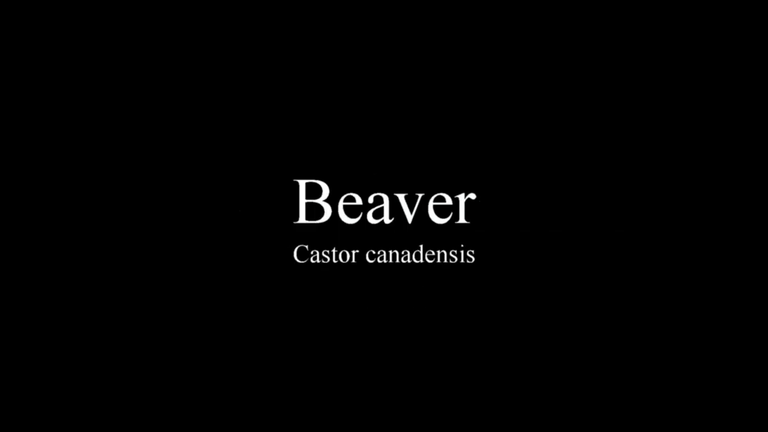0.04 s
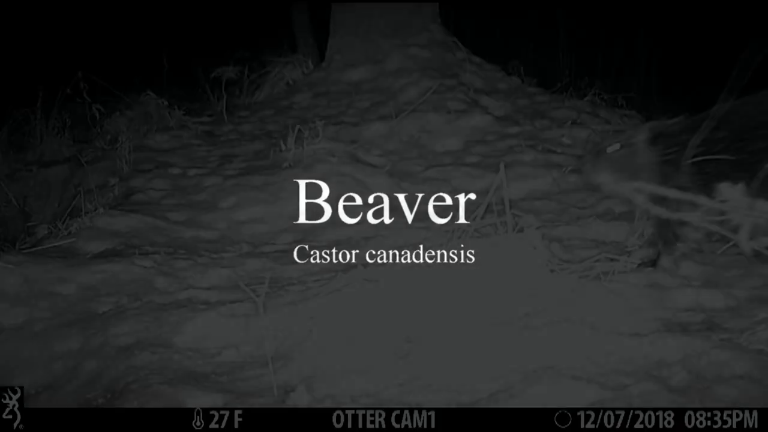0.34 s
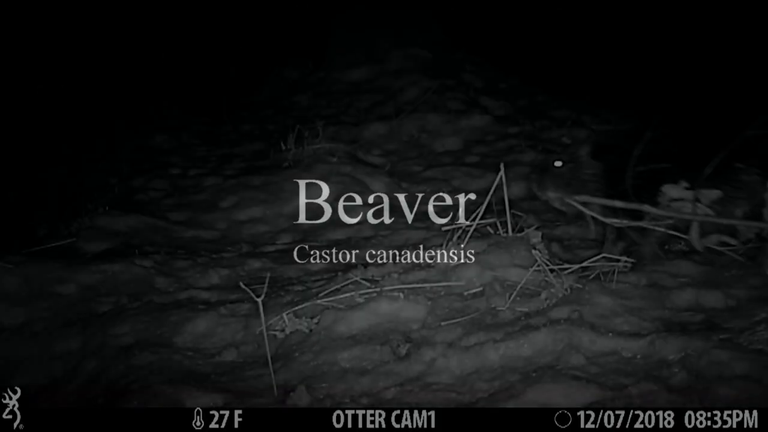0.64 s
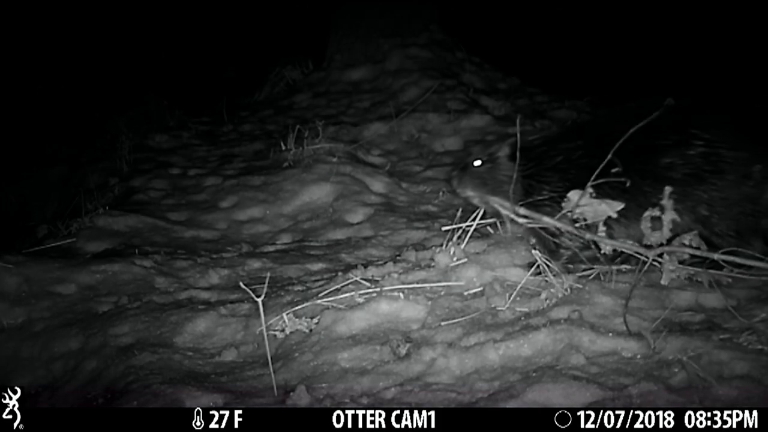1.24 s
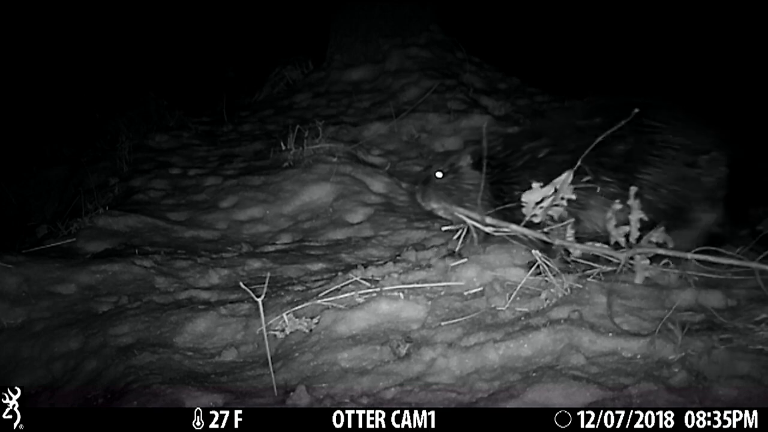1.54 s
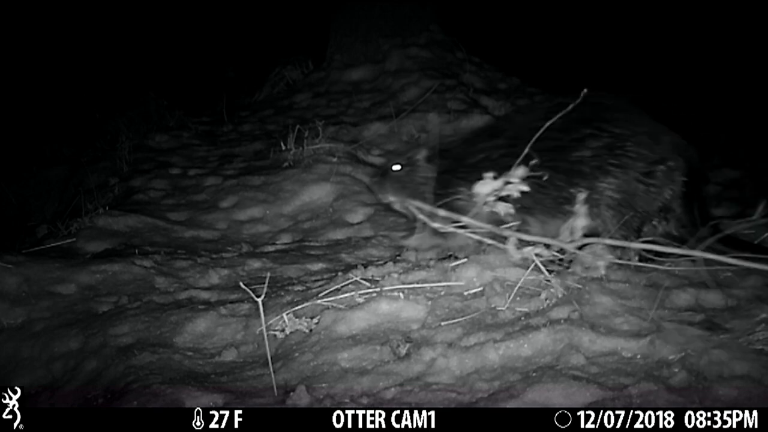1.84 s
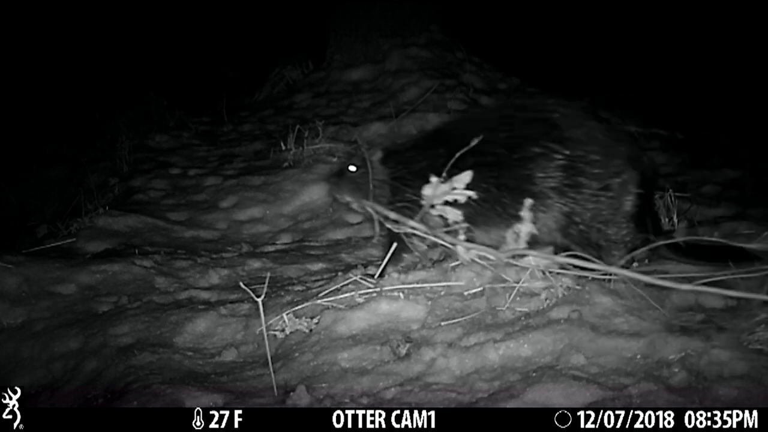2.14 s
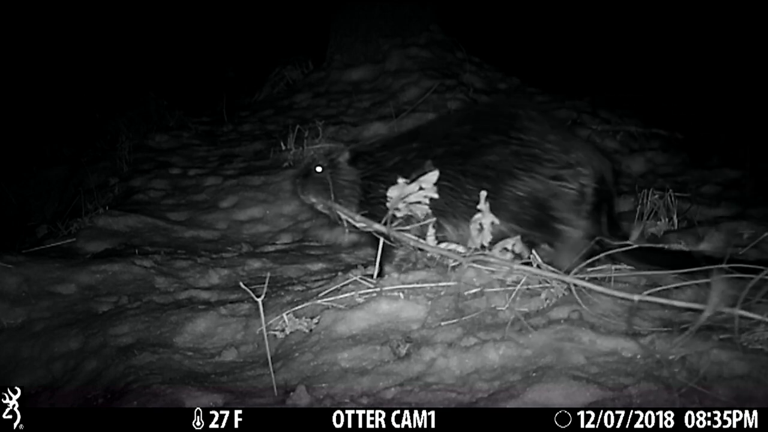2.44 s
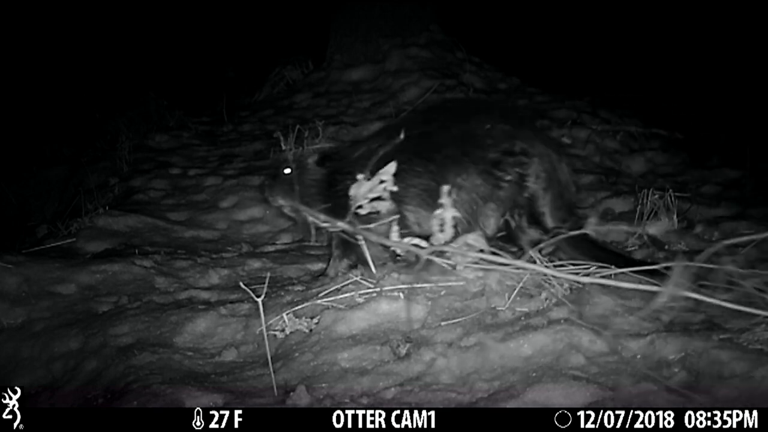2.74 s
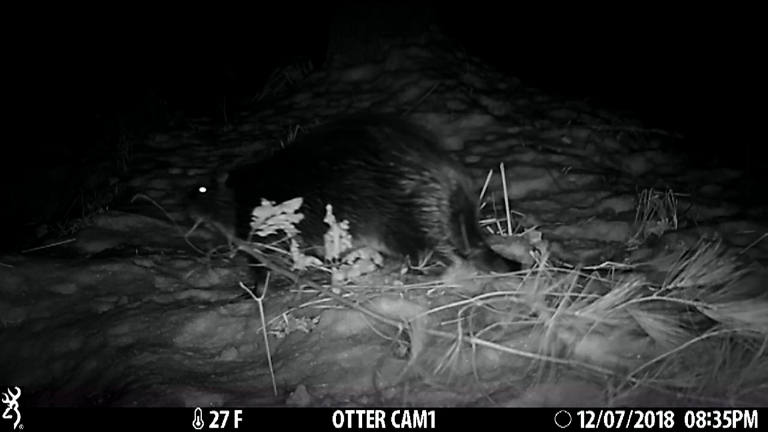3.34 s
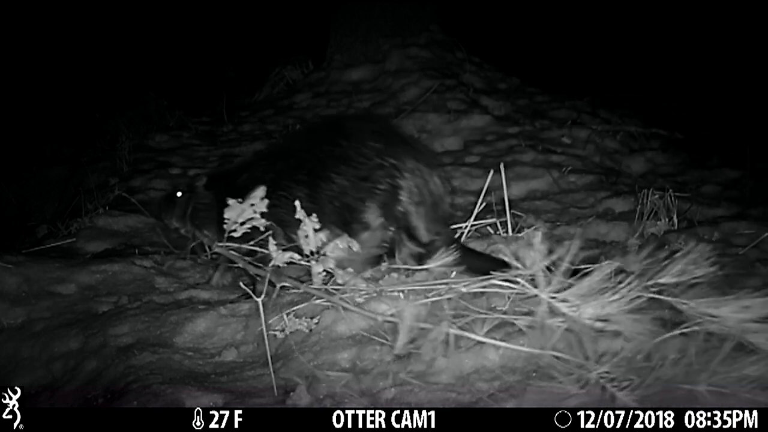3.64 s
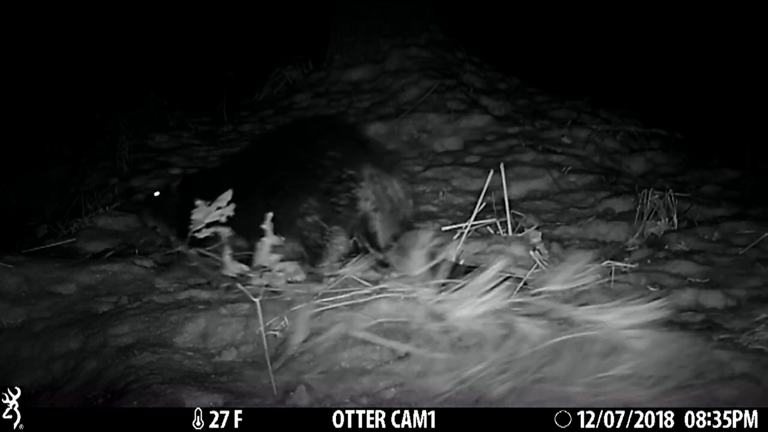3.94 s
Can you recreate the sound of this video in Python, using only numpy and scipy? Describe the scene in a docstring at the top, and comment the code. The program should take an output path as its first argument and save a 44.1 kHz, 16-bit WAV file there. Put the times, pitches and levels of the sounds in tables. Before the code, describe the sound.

Leafy branches dragged over dry ground fade in with a fine, crackling rustle. From about 0.6 seconds twigs snap and leaves swish at each tug, brightest near 1.4 seconds. The beaver's feet thud faintly, clearest at 1.8 seconds. The dragging is loudest around 2 and 3 seconds, then eases slightly and continues to 4 seconds. It sounds thin and crisp against still night air.

```python
"""A still night fades in, and a beaver drags leafy branches over dry ground.
From the start, leaves and needles crackle in countless tiny slips. After half a second twigs begin
to snap and flick; then the leaves swish at each tug and soft feet thud on the ground.
The dragging is loudest near two seconds and again near three, then eases a little.
Throughout, a small microphone that rings near 5.5 kHz makes the leaves and twigs thin and crisp."""
import sys
import numpy as np
from scipy import signal
from scipy.fft import rfft, irfft, next_fast_len
from scipy.io import wavfile
from scipy.ndimage import uniform_filter1d

SR = 44100
rng = np.random.default_rng(int(sys.argv[2]) if len(sys.argv) > 2 else 0)


def store_wav(level_fs):
    """Save 16-bit WAV to argv[1]."""
    pcm = np.round(np.clip(np.atleast_2d(level_fs), -1, 1) * 32767)
    wavfile.write(sys.argv[1], SR, pcm.T.astype(np.int16))


N = 176400
T = np.arange(N) / SR

# tone of dry leaves through the microphone (frequency [Hz], gain [dB])
LEAF_TONE = [(100, -34), (350, -27), (600, -27), (950, -27.5), (1550, -19), (2000, -20), (2450, -21),
             (3200, -14), (4050, -12), (4500, -7), (5050, -0.7), (6000, -0.6), (7100, -8), (8500, -13),
             (10200, -17), (12000, -23.5), (13700, -28), (15700, -27)]


def from_db(db):
    """Turn decibels into a number to multiply by."""
    return 10 ** (np.asarray(db) / 20)


def rms_one(x):
    """Scale a signal so that its average strength (rms) is 1."""
    return x / np.sqrt(np.mean(x ** 2) + 1e-20)


def curve(rows):
    """Join (time [s], value) points with straight lines."""
    return np.interp(T, *np.transpose(rows))


def drift(hz):
    """A smooth random wobble of strength 1; higher hz wobbles faster."""
    r = np.exp(-2 * np.pi * hz / SR)
    return rms_one(signal.lfilter([1], [1, -2 * r, r * r], rng.standard_normal(N + SR))[SR:])


def colour(x, points):
    """Shape the tone to follow (frequency [Hz], gain [dB]) points."""
    size = 2 * next_fast_len(len(x) // 2 + 1024)
    hz, db = np.transpose(points)
    log_hz = np.log(np.arange(size // 2 + 1) * SR / size + 1)
    log_gain = np.log(from_db(np.interp(log_hz, np.log(hz), db)))
    # this folding makes the filter ring after a click, never before it
    cepstrum = irfft(log_gain)
    cepstrum[1:size // 2] *= 2
    cepstrum[size // 2 + 1:] = 0
    return irfft(rfft(x, size) * np.exp(rfft(cepstrum)))[:len(x)]


def resonate(x, hz, width_hz):
    """Ring at one pitch; a narrower width rings longer."""
    r = np.exp(-np.pi * width_hz / SR)
    feedback = [1, -2 * r * np.cos(2 * np.pi * hz / SR), r * r]
    return signal.lfilter(np.array([1, 0, -1]) * (1 - r * r) / 2, feedback, x + 1e-18)


def butter(x, hz, kind):
    """A gentle filter that keeps the lows, the highs or a band."""
    return signal.sosfilt(signal.butter(2, hz, kind, fs=SR, output="sos"), x + 1e-18)


def night_air():
    """Still air is a faint, even noise, strongest in the bass."""
    # tone of the air (frequency [Hz], gain [dB])
    air_tone = [(20, 0), (50, -9), (150, -9), (400, -8), (1000, -5.5), (4000, -15), (15000, -24.5)]
    return from_db(-76.5) * rms_one(colour(rng.standard_normal(N), air_tone))


def leaf_flicker(x, depth_db=1.3):
    """Different leaves take turns, so each band of pitches flickers by itself."""
    centres = np.log(np.geomspace(800, 15000, 9))
    spectrum = rfft(x)
    log_hz = np.log(np.arange(N // 2 + 1) * SR / N + 1)
    bands = (irfft(spectrum * np.interp(log_hz, centres, share), N) for share in np.eye(len(centres)))
    return rms_one(sum(band * from_db(depth_db * drift(hz=60)) for band in bands))


def leaf_slips(per_second, spread_db=5, rub_s=0.0026):
    """Leaves catch and slip: each tiny click rings one of many leaves and ends in a short rub."""
    sizes = from_db(spread_db * np.minimum(rng.exponential(1, N), 3.1))
    signs = rng.choice([-1, 1], N)
    clicks = sizes * signs * (rng.random(N) < per_second / SR) / np.sqrt(per_second)
    pitches = np.geomspace(1300, 13000, 20)
    which_leaf = rng.integers(0, len(pitches), N)
    rings = sum(resonate(clicks * (which_leaf == k), hz, width_hz=750) for k, hz in enumerate(pitches))
    tails = np.sqrt(signal.lfilter([1], [1, -np.exp(-2 / (rub_s * SR))], clicks ** 2 + 1e-18))
    rub = from_db(-8.5) * rms_one(tails * rng.standard_normal(N))
    return leaf_flicker(colour(rms_one(clicks + 2.7 * rings) + rub, LEAF_TONE))


def dragging(clump_db=3.5):
    """Harder dragging makes louder and denser crackle, in clumps, over a fine hiss of needles."""
    # strength of the steady dragging (time [s], level [dB])
    drag_levels = [(0.1, -60.5), (0.52, -59), (0.75, -53), (1.0, -55), (1.22, -54), (1.34, -53),
                   (1.52, -50), (1.67, -49.5), (1.83, -48), (2.0, -46), (2.22, -46.5), (2.3, -50),
                   (2.47, -54), (2.6, -47.5), (2.71, -52.5), (2.82, -47), (3.06, -46), (3.22, -51),
                   (3.33, -51), (3.42, -53.5), (3.63, -53), (3.78, -52.5), (3.86, -50), (4.0, -51.5)]
    db = curve(drag_levels)
    slips_per_second = 4000 * from_db(0.4 * (db - db.mean()))
    crackle = leaf_slips(slips_per_second) * from_db(clump_db * drift(hz=93))
    needles = leaf_flicker(colour(rng.standard_normal(N), LEAF_TONE))
    hiss = needles * from_db(-1.5 + 1.9 * drift(hz=52))
    return from_db(db) * (crackle + hiss)


def twig_snaps(strain_s=0.0024, crack_s=0.0012, splinter_s=0.0083):
    """A twig strains briefly, then a sharp crack and a dying spray of splinters set it ringing."""
    # snaps and flicks; all levels are relative
    # (time [s], level [dB], treble [dB], woody middle [dB], ring pitch [Hz], splinters [dB])
    snaps = [(0.587, -34.5, -22, -42, 4900, -9), (0.611, -39.5, -22, -42, 5270, -9),
             (1.0993, -33, -20, -29, 5150, -13), (1.1653, -33, -24, -28.5, 5460, -2),
             (1.256, -30.5, -16.5, -32, 5300, -9), (1.295, -31.5, -24, -24, 5760, -9),
             (1.604, -35.5, -32, -33, 6200, -12), (1.651, -34, -19, -28, 5200, -6),
             (1.6891, -27.5, -28, -32, 5550, -6.5), (1.7514, -32, -21, -28, 5700, -9),
             (1.7868, -35, -24, -33, 5140, -6), (1.8055, -27, -20.5, -33.5, 5580, -11),
             (1.8446, -32, -25, -24, 5800, -10), (1.8781, -29.5, -22, -31, 5300, -10.5),
             (1.986, -26, -21.5, -35, 4800, -10), (2.0594, -34, -22, -39, 5500, -13),
             (2.1447, -30.5, -21, -44, 5960, -12), (2.1836, -33, -25, -27, 5670, -5),
             (2.3317, -36.5, -24, -34, 5030, -6), (2.5051, -31, -25.5, -30, 5600, -7),
             (2.566, -30.5, -23, -21, 4600, -12), (2.5941, -29.5, -24.5, -30.5, 4800, -12),
             (2.6312, -30, -19, -38, 4840, -10.5), (3.0326, -36, -19, -27, 5160, -7),
             (3.326, -33, -29, -38, 5700, -9), (3.46, -35.5, -20, -20, 5650, -10),
             (3.5006, -32.5, -22, -26, 5100, -11), (3.5563, -36.5, -38, -26, 6340, -9.5),
             (3.5935, -37.5, -30, -27, 5760, -8), (3.689, -30.5, -23.5, -28.5, 6080, -9),
             (3.7428, -37, -23.5, -22.5, 5290, -14)]
    usual_treble_db, usual_middle_db = -24.5, -30
    out = np.zeros(N + SR)
    lead = SR // 100
    t = T[:SR // 20] - lead / SR  # the twig breaks at t = 0
    after = np.maximum(t, 0)
    for time, db, treble_db, middle_db, hz, splinter_db in snaps:
        crack, spray, uneven = rng.standard_normal((3, len(t)))
        strain = from_db(-6) * spray * np.exp(-np.abs(t) / strain_s)
        splinters = from_db(splinter_db) * spray * np.abs(uneven) * np.exp(-after / splinter_s)
        burst = np.where(t < 0, strain, crack * np.exp(-after / crack_s) + splinters)
        ring = 1.35 * resonate(burst, hz, width_hz=690)
        wood = 0.7 * resonate(burst, 0.28 * hz, width_hz=450)
        snap = colour(burst + ring + wood, LEAF_TONE)
        middle, treble = middle_db - usual_middle_db, treble_db - usual_treble_db
        tone = [(600, -1), (1500, middle), (4000, 0.017), (6500, 0), (10000, treble), (15000, treble - 3)]
        snap = colour(snap, tone)
        height = np.sqrt(uniform_filter1d(snap ** 2, size=44).max())  # the loudest millisecond
        start = int(time * SR) - lead
        out[start:start + len(t)] += from_db(db - 3.5) * snap / height
    return out[:N]


def tugs():
    """Each tug is a brief swell of very dense slips; a few, near 1.4 seconds, are much brighter."""
    # pulls on the leaves (peak time [s], half length [s], relative level [dB], treble lift [dB])
    pulls = [(0.765, .02, -55, 1), (1.028, 0.018, -50, -7), (1.099, 0.011, -49, -3),
             (1.126, 0.013, -47.5, -6), (1.263, 0.0083, -44.5, 1), (1.292, .007, -49, -1),
             (1.692, .006, -43, -2), (1.172, .014, -50, 0), (1.31, .018, -53, 0), (1.363, 0.014, -45.5, -2),
             (1.402, 0.025, -42, 9), (1.426, 0.03, -43.5, 10), (1.474, 0.038, -48.5, 10.5),
             (1.917, 0.063, -42.5, -2), (2.016, .065, -43.5, -2), (2.136, 0.054, -44, 0),
             (2.194, 0.028, -46.5, 0), (2.37, 0.031, -45.5, 0.5), (2.44, .03, -53.5, 0),
             (2.543, .012, -52, 0), (2.635, 0.042, -45.5, -1.5), (2.751, 0.034, -44, -2),
             (2.849, 0.026, -46, 3), (2.959, 0.026, -46, 0), (3.064, 0.058, -46.5, 1),
             (3.163, 0.043, -49, 1), (3.328, 0.091, -49, 1), (3.558, .008, -48, -1), (3.692, .007, -47, 1),
             (3.831, 0.037, -48.5, 3.5)]
    swish = leaf_slips(per_second=12000)
    treble = colour(swish, [(6000, -37), (7500, -2), (10000, -4.5), (14000, -3)])
    out = np.zeros(N)
    for time, half_length, db, lift_db in pulls:
        swell = from_db(db + 1.08) * np.exp(-2 * ((T - time) / half_length) ** 2)
        brightness = np.sqrt(max(from_db(2 * lift_db) - 1, 0.0))  # a lift below 0 dB adds nothing
        out += swell * (swish + brightness * treble)
    return out


def footsteps(press_s=0.0023, scuff_s=0.02):
    """Padded feet press in gently: the ground rings briefly and loose soil scuffs."""
    # soft footfalls (time [s], thud level [dB])
    footfalls = [(0.765, -71), (1.162, -66), (1.243, -69), (1.256, -67), (1.736, -72), (1.8438, -49.5),
                 (1.9476, -58.5), (2.757, -68), (3.059, -68)]
    # low notes of the ground (pitch [Hz], relative level [dB], time to fade by 60 dB [s])
    ground_notes = [(247, -7, 0.029), (341, 0.5, 0.029), (580, -9, 0.022)]
    t = T[:SR // 10]
    press = 1 - np.exp(-(t / press_s) ** 2)
    ring = sum(from_db(db - 60 * t / fade_s) * np.sin(2 * np.pi * hz * t)
               for hz, db, fade_s in ground_notes)
    thud = butter(ring * press, hz=910, kind="low")
    thud /= np.abs(thud).max()
    out = np.zeros(N + SR)
    for time, db in footfalls:
        soil = rms_one(butter(rng.standard_normal(len(t)), hz=(190, 590), kind="band"))
        scuff = from_db(-73.5) * soil * press * np.exp(-t / scuff_s)
        start = int(time * SR)
        out[start:start + len(t)] += from_db(db) * thud + scuff
    return out[:N]


def scene():
    """Night air, branches and feet add up in one channel."""
    return (night_air() + dragging() + twig_snaps() + tugs() + footsteps())[None]


def record(dry, cutoff_hz=15750):
    """The sound fades in and the highest treble is cut away."""
    # rising volume (time [s], gain [dB])
    fade_in = [(0, -92), (0.085, -81), (0.1, -31), (0.15, -24.5), (0.25, -14), (0.38, -6), (0.55, -4.5)]
    low_pass = signal.firwin(601, cutoff_hz, fs=SR, window="blackman")
    return signal.fftconvolve(dry * from_db(curve(fade_in)), low_pass[None], mode="same")


dry = scene()
out = record(dry)
store_wav(out)
```